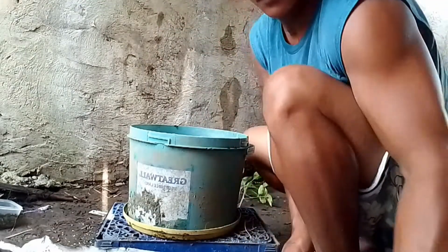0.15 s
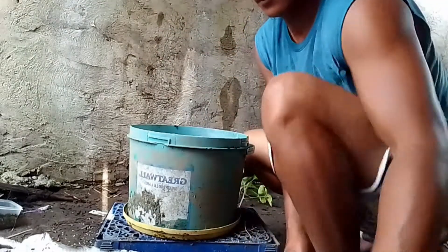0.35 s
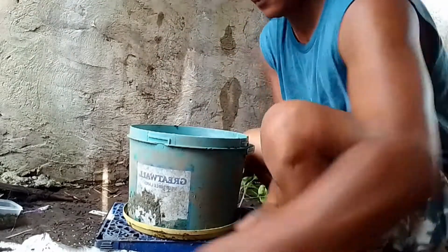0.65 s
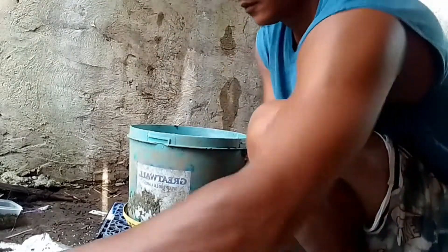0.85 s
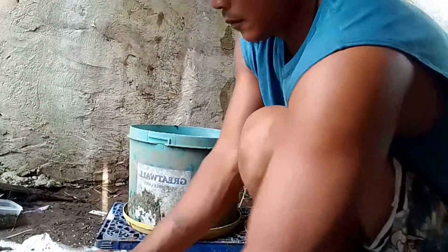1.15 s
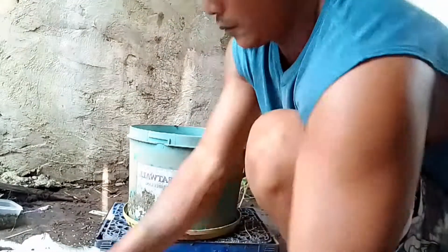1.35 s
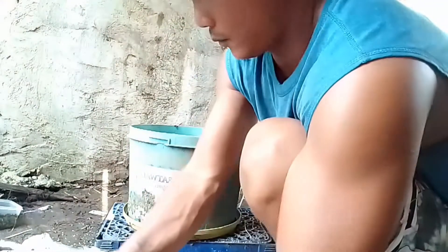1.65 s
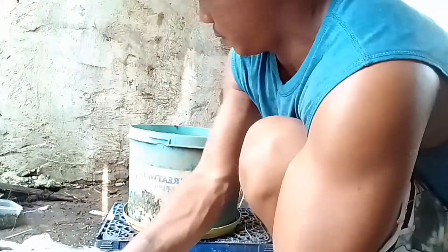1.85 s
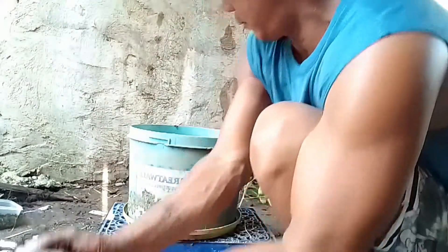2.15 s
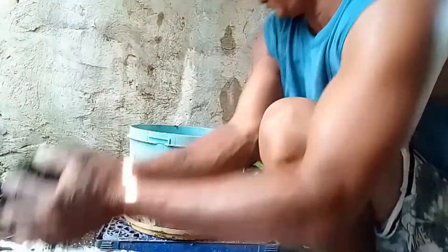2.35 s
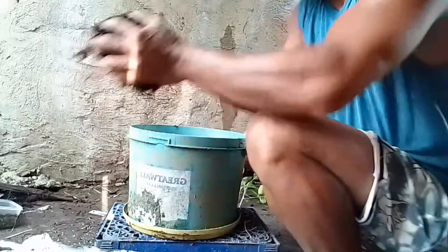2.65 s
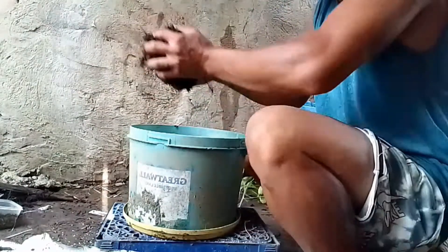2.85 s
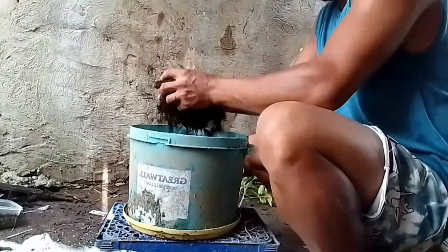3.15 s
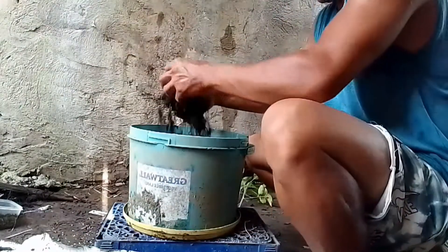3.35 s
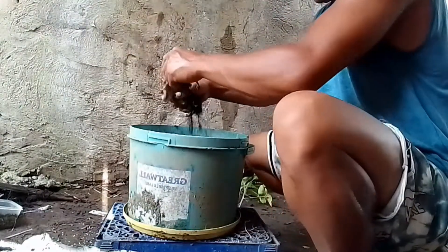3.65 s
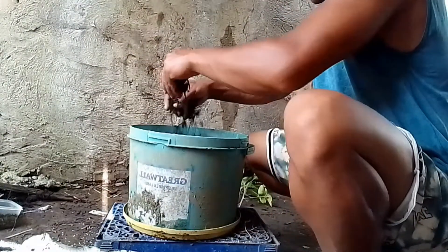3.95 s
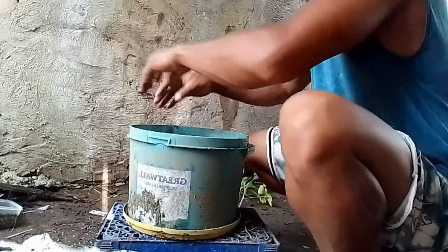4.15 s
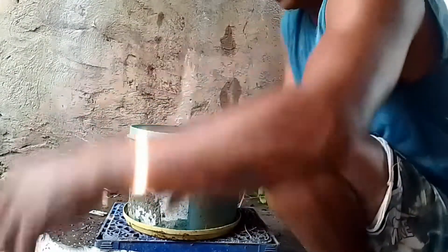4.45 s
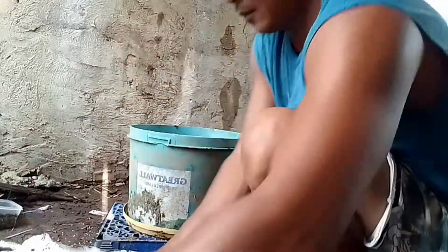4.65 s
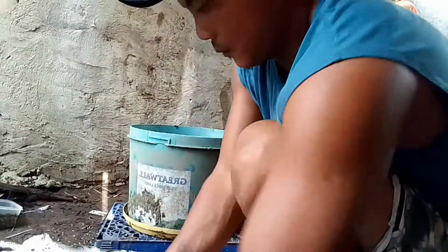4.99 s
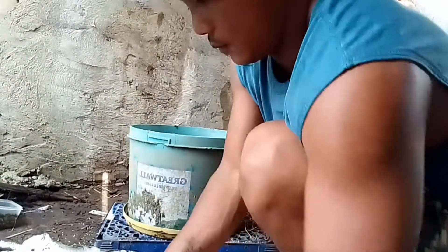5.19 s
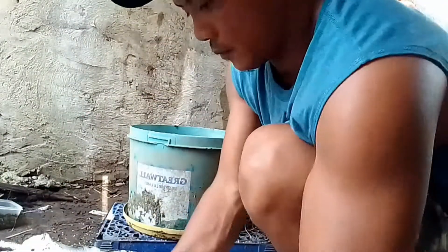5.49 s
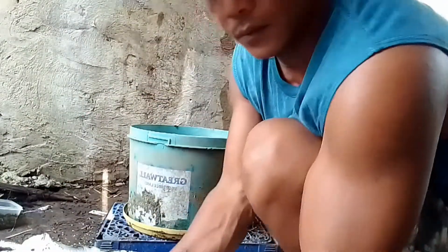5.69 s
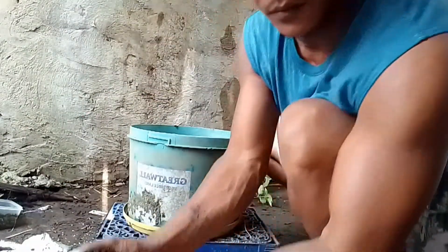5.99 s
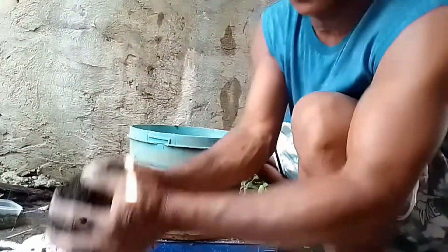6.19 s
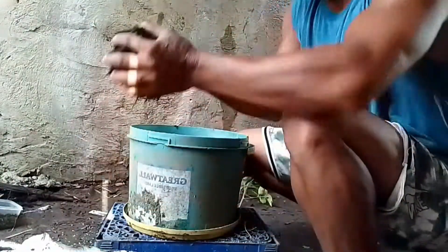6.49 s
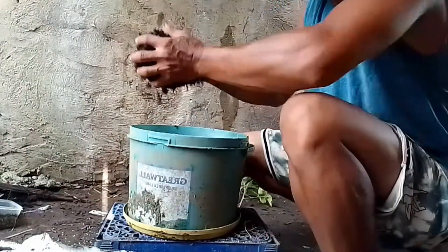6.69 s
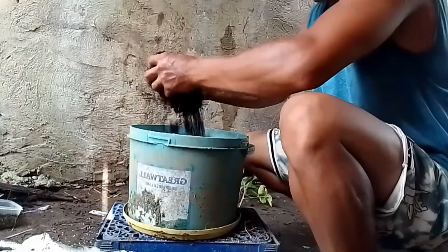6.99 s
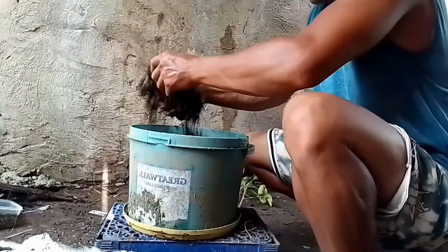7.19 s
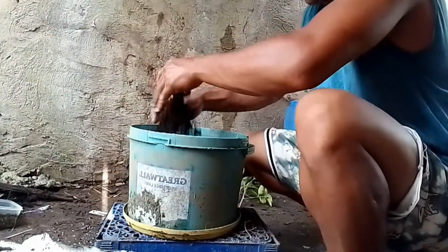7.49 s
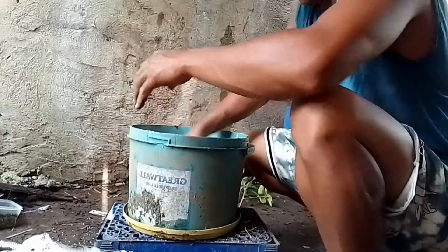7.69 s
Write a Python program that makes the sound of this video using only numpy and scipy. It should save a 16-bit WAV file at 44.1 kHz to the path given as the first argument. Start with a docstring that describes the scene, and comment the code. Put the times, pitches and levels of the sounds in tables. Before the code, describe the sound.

Close gritty soil scraping, a drumming pour into a resonant plastic bucket, plasticky rustles and a faint second pour, with a low engine drone beyond.

```python
"""Close by in a walled yard, hands scrape potting soil together on a plastic sack and crumble it into
a plastic bucket, twice: grains of filtered noise, swelling and sagging with each move. The first handful
drums on the bare bottom as ringing thumps, the second lands softly on soil; grit snaps and the sack ticks
as short bursts. Farther off, beyond the walls, a small engine putters as a sum of harmonics, speeds up
a little and settles. Low noise is the outdoor air."""
import sys
import numpy as np
from scipy import signal
from scipy.fft import rfft, irfft
from scipy.io import wavfile
from scipy.ndimage import uniform_filter1d, minimum_filter1d, map_coordinates

SR = 44100
rng = np.random.default_rng(int(sys.argv[2]) if len(sys.argv) > 2 else 0)


def dump(signal):
    """Clip the signal to [-1, 1] and save it as 16-bit WAV at the path in sys.argv[1]."""
    limited = np.clip(np.atleast_2d(signal).T, -1, 1)
    pcm = np.round(limited * 32767).astype(np.int16)
    wavfile.write(sys.argv[1], SR, pcm)


N = 345303  # samples

# In all tables, level columns are relative: the functions add their own trims.


def from_db(db):
    """Decibels to gain."""
    return 10 ** (np.asarray(db) / 20)


def rms_one(x):
    """Scale to rms 1."""
    return x / np.sqrt(np.mean(x ** 2) + 1e-20)


def in_time(rows):
    """One curve per column after the first, joined by straight lines."""
    s, *columns = np.transpose(rows)
    return [np.interp(np.arange(N) / SR, s, column) for column in columns]


def drift(corner_hz):
    """Slow random wandering with spread near 1: low-passed noise made at a fortieth of the sample rate."""
    step = 40
    pole = np.exp(-2 * np.pi * corner_hz * step / SR)
    noise = rng.standard_normal(N // step + 2002)
    slow = signal.lfilter([1], [1, -2 * pole, pole * pole], noise)[2000:]  # drop the filter's start
    return np.interp(np.arange(N) / step, np.arange(len(slow)), rms_one(slow))


def cut(x, hz, kind, order=2):
    """Butterworth low- or high-pass."""
    sos = signal.butter(order, min(hz, SR / 2 - 1), kind, fs=SR, output="sos")
    return signal.sosfilt(sos, x + 1e-18)


def resonate(x, hz, width_hz):
    """A two-pole resonance with gain 1 on top."""
    r = np.exp(-np.pi * width_hz / SR)
    top = np.array([1, 0, -1]) * (1 - r * r) / 2
    return signal.lfilter(top, [1, -2 * r * np.cos(2 * np.pi * hz / SR), r * r], x + 1e-18)


def colour(x, spectrum, size=8192):
    """Causal (minimum-phase) filter with the given spectrum, found through the cepstrum."""
    hz, db = np.transpose(spectrum)
    grid = np.maximum(np.arange(size // 2 + 1) * SR / size, 1)
    cepstrum = irfft(np.log(from_db(np.interp(np.log(grid), np.log(hz), db))))
    # folding the cepstrum onto positive times makes the filter causal
    cepstrum[1:size // 2] *= 2
    cepstrum[size // 2 + 1:] = 0
    return signal.oaconvolve(x, irfft(np.exp(rfft(cepstrum))))[:len(x)]


def add(track, s, sound):
    """Mix a sound in at time s."""
    start = max(round(s * SR), 0)
    track[start:start + len(sound)] += sound[:N - start]


def gestures(rows, sag_db_per_s, grit_sag_db_per_s, release_db_per_s):
    """Each move swells, sags as the soil runs out (a negative sag rises) and dies away; (body, grit) gains."""
    body, grit = np.zeros(N), np.zeros(N)
    for start, swell_s, hold_s, body_db, grit_db in rows:
        t = np.arange(N) / SR - start
        swell = np.clip(t / max(swell_s, .002), 0, 1) ** 2
        held = np.clip(t - swell_s, 0, hold_s)
        shape = swell * from_db(-release_db_per_s * np.clip(t - swell_s - hold_s, 0, 2))
        # overlapping moves add as powers
        body += (shape * from_db(body_db - sag_db_per_s * held)) ** 2
        grit += (shape * from_db(grit_db - grit_sag_db_per_s * held)) ** 2
    return np.sqrt(body), np.sqrt(grit)


def grains(per_s, spread_db):
    """Clicks at random moments: many small and a few large crumbs (a negative spread: a few small ones)."""
    sizes = from_db(spread_db * np.minimum(rng.exponential(1, N), 5))
    signs = rng.choice([-1, 1], N)
    struck = rng.random(N) < per_s / SR
    return rms_one(sizes * signs * struck)


def crumbs(levels, spectrum, per_s, spread_db, clump_db, catch_db, low_hz, body_db, grit_db, in_bucket=False):
    """A clumpy stream of grains that catches and gives: its lower part is the body, its top the fine grit."""
    body_level, grit_level = levels
    clicks = grains(per_s, spread_db)
    unsteady = from_db(clump_db * drift(20) + catch_db * drift(4.9))
    stream = colour(clicks * unsteady, spectrum)
    if in_bucket:
        stream = bucket(stream)
    stream = cut(stream, low_hz, "high", order=4)
    split_hz = 2500
    body = rms_one(cut(stream, split_hz, "low", order=4))
    grit = rms_one(cut(stream, split_hz, "high", order=4))
    return from_db(body_db) * body_level * body + from_db(grit_db) * grit_level * grit


# hand strokes through the loose heap: start_s, swell_s, hold_s, scrape_db, grit_db
HEAP_STROKES = [(-0.02, 0.017, 0.2, -18, -26.5), (.098, 0.0077, 0.013, -21, -44),
                (.23, 0.018, 0.1, -19.5, -30), (.262, 0.0041, 0.017, -24, -34.5),
                (.345, 0.0039, 0.013, -21, -29.5), (.45, 0.012, 0.21, -23, -33.5),
                (.73, 0.028, 0.037, -25, -28), (.83, 0.0099, 0.25, -31, -43.5),
                (1.0, 0.14, 0.28, -35.5, -54)]
# colour of the scraped soil: frequency_hz, density_db
SOIL_SPECTRUM = [(190, -49), (330, -9), (649, -6.5), (1000, -5), (1360, -2.5), (1550, -6), (2040, -13.5),
                 (4860, -19.5), (5440, -21), (8140, -21.5), (10000, -34), (15500, -34.5)]


def heap_scraping():
    """Hands dragged through loose soil: dense grains under quick strokes."""
    levels = gestures(HEAP_STROKES, sag_db_per_s=16.5, grit_sag_db_per_s=12.5, release_db_per_s=121)
    return crumbs(levels, SOIL_SPECTRUM, per_s=7000, spread_db=1.5, clump_db=1.5, catch_db=0.23,
                  low_hz=261, body_db=-2.0, grit_db=-0.9)


# hand strokes along the sack: start_s, swell_s, hold_s, scrape_db, grit_db
SACK_STROKES = [(5.03, 0.12, 0.086, -46, -42.5), (5.2, 0.047, 0.017, -48, -34),
                (5.3, 0.029, 0.12, -46, -38.5), (5.42, 0.08, 0.25, -43, -39), (5.58, 0.09, 0.042, -34, -24),
                (5.7, 0.044, 0.056, -29, -29.5), (5.82, 0.044, 0.11, -46, -47),
                (5.98, 0.031, 0.066, -53, -44.5), (6.13, 0.037, 0.09, -55, -53)]
# colour of soil on the plastic sack, also for the spills: frequency_hz, density_db
SACK_SPECTRUM = [(240, -49), (400, -10), (543, -12), (750, -14.5), (950, -8), (1200, -1), (1470, -0.5),
                 (2430, -14), (3010, -8.5), (3570, -15.5), (7320, -14.5), (8600, -20), (10100, -28),
                 (15500, -22)]


def sack_scraping():
    """Hands dragged along the sack: sparser, clumpier grains in the plastic's colour."""
    levels = gestures(SACK_STROKES, sag_db_per_s=12, grit_sag_db_per_s=15, release_db_per_s=170)
    return crumbs(levels, SACK_SPECTRUM, per_s=3500, spread_db=-0.2, clump_db=2.5, catch_db=-0.15,
                  low_hz=302, body_db=-3.0, grit_db=-7.0)


# gushes onto the bucket's bare bottom: start_s, swell_s, hold_s, patter_db, grit_db
BARE_POURS = [(3.265, 0.0085, .03, -27.5, -70), (3.308, 0.0062, 0.066, -18, -44),
              (3.35, 0.026, 0.08, -17, -29), (3.45, 0.035, 0.1, -17, -29),
              (3.635, 0.068, 0.063, -21, -31.5), (3.775, 0.054, 0.036, -28, -48),
              (3.9, 0.063, 0.39, -32, -51), (4.43, 0.0038, 0.025, -28, -67)]
# colour of crumbs on the bare bottom, also for the clods: frequency_hz, density_db
PATTER_SPECTRUM = [(130, -50), (220, -8), (268, -7.5), (303, 3), (337, -7), (441, 4), (526, -19),
                   (867, -3.5), (930, -12.5), (1150, -13.5), (1350, -10), (1680, -18), (2110, -29.5),
                   (4790, -42.5), (15500, -67.5)]


def bare_pouring():
    """Soil pattering on bare plastic: grains that set the bucket ringing."""
    levels = gestures(BARE_POURS, sag_db_per_s=14.0, grit_sag_db_per_s=8, release_db_per_s=116)
    return crumbs(levels, PATTER_SPECTRUM, per_s=3400, spread_db=0.46, clump_db=2.5, catch_db=-1.6,
                  low_hz=214, body_db=3.5, grit_db=-4.0, in_bucket=True)


# air and walls of the bucket: resonance_hz, width_hz, level_db
BUCKET_RESONANCES = [(329, 22, -2.5), (352, 17, 0.5), (475, 24, 4), (559, 8.6, 18.5), (627, 7, 11),
                     (890, 8.2, 2.5), (1473, 10, 4), (1337, 27, 7)]


def bucket(x):
    """The bucket's resonances ring along with the grains that land in it."""
    return x + sum(from_db(db) * resonate(x, hz, width) for hz, width, db in BUCKET_RESONANCES)


# clods landing in the bucket: start_s, thump_db, spatter_db
CLODS = [(3.273, -33, -47), (3.307, -20, -22), (3.357, -7, -9), (3.387, -14.5, -19), (3.417, -10, -26),
         (3.444, -8, -28), (3.5, -17, -15), (3.562, -6, -9.5), (3.723, -12, -17.5), (3.744, -12, -23),
         (3.854, -12, -12.5), (3.926, -16.5, -29.5), (4.012, -34, -32), (4.075, -43, -24),
         (4.115, -14.5, -20.5), (4.237, -30, -37), (4.344, -28.5, -56), (4.415, -6.5, -25.5),
         (4.479, -37, -34), (6.89, -59, -36.5), (7.182, -40, -49), (7.24, -49, -48), (7.442, -35, -38),
         (7.51, -49, -48), (7.573, -46, -49), (7.605, -34.5, -60), (7.629, -48, -37), (7.703, -50, -49),
         (7.741, -40, -45)]
# the thump's pitch sinks as the soil loads the bottom: first clod, last clod
EMPTY_THUMP_HZ, LOADED_THUMP_HZ = 445, 388


def clods(thump_width_hz=110, burst_s=0.012, trickle_s=0.027, trickle_db=-15,
          thump_gain_db=4, spatter_gain_db=-1, dull_hz=2600, rebound_db=-11):
    """A clod thumps the bucket's bottom, bursts into a dull spatter and trickles to rest."""
    t = np.arange(SR // 5) / SR
    out = np.zeros(N)
    spatter = cut(colour(grains(4000, 1.4), PATTER_SPECTRUM), 470, "high", order=4)
    spatter = rms_one(cut(spatter, dull_hz, "low"))
    rise = t / burst_s * 2  # the burst peaks at half of burst_s
    burst = rise * np.exp(1 - rise) + from_db(trickle_db) * np.exp(-t / trickle_s)
    pitches = np.geomspace(EMPTY_THUMP_HZ, LOADED_THUMP_HZ, len(CLODS))
    rebound_gaps_s = 0.01 * rng.uniform(0.56, 2.2, (len(CLODS), 2))
    for (s, thump_db, spatter_db), hz, gaps in zip(CLODS, pitches, rebound_gaps_s):
        thump = 1. * (t == 0)
        for _ in range(3):
            thump = resonate(thump, hz, thump_width_hz)  # a soft landing swells over a few cycles
        thump = thump / np.abs(thump).max()
        # the clod's pieces land again, weaker each time
        for k, delay in enumerate(np.cumsum([0, *gaps])):
            add(out, s + delay, from_db(thump_db + thump_gain_db + k * rebound_db) * thump)
        stretch = np.roll(spatter, -round(s * SR))[:len(t)]
        add(out, s, from_db(spatter_db + spatter_gain_db) * burst * stretch)
    return out


# loose soil falling on soil, on the heap or in the bucket: start_s, swell_s, hold_s, patter_db, grit_db
SOFT_POURS = [(1.05, 0.14, 0.42, -36, -56), (2.23, .025, 0.11, -53, -58.5), (3.95, 0.16, 0.48, -46, -51.5),
              (6.85, 0.016, 0.035, -45.5, -50), (6.9, .04, 0.42, -63, -73),
              (7.178, 0.0075, 0.082, -40, -66), (7.41, 0.0081, 0.079, -44.5, -57.5),
              (7.5, 0.0047, 0.29, -35.5, -56.5)]
# colour of soil on soil: frequency_hz, density_db
SOFT_SPECTRUM = [(180, -48.5), (300, 4), (447, 7), (560, -28), (720, -13.5), (1020, -13.5), (1340, 8),
                 (1550, -15), (1800, -19.5), (2610, -29.5), (2900, -24), (4420, -26), (9000, -46),
                 (15500, -62)]


def soft_pouring():
    """Soil landing on soil: sparse, uneven grains without the bucket's ring."""
    levels = gestures(SOFT_POURS, sag_db_per_s=23.5, grit_sag_db_per_s=7.5, release_db_per_s=133)
    return crumbs(levels, SOFT_SPECTRUM, per_s=1500, spread_db=2.0, clump_db=2.5, catch_db=2.5,
                  low_hz=288, body_db=-0.5, grit_db=-3.0)


# stray crumbs sprinkling on the sack: start_s, swell_s, hold_s, patter_db, grit_db
SPILLS = [(3.75, 0.098, 0.74, -68, -70), (4.42, 0.09, 0.21, -63.5, -65)]


def spilling():
    """Stray crumbs on the sack: sparse, clumpy grains with only the treble left."""
    levels = gestures(SPILLS, sag_db_per_s=-4, grit_sag_db_per_s=-7.0, release_db_per_s=88)
    return crumbs(levels, SACK_SPECTRUM, per_s=1400, spread_db=-1.5, clump_db=5.0, catch_db=3.0,
                  low_hz=3700, body_db=5, grit_db=5.5)


# fingers brushing lightly over the sack: start_s, swell_s, hold_s, scrape_db, grit_db
BRUSHES = [(1.71, 0.025, 0.074, -44, -48), (2.74, 0.017, 0.059, -59, -54.5), (6.41, 0.018, 0.21, -44, -53)]
# their thin, dry colour: frequency_hz, density_db
BRUSH_SPECTRUM = [(500, -9), (1350, 2.5), (1700, -18.5), (2250, -6.5), (2800, -5), (3350, -1.5), (3950, -5),
                  (4700, -0.5), (5600, -8), (7000, -6), (10000, -16), (15500, -14)]


def brushing():
    """Light fingers on plastic: grains whose grit fades faster than their body."""
    levels = gestures(BRUSHES, sag_db_per_s=7, grit_sag_db_per_s=28.5, release_db_per_s=87.5)
    return crumbs(levels, BRUSH_SPECTRUM, per_s=3400, spread_db=1.0, clump_db=1.5, catch_db=0.5,
                  low_hz=300, body_db=-8.5, grit_db=-5.0)


# bits of grit and twig snapping: start_s, knock_db, crack_db
SNAPS = [(0.11, -2, -39), (0.278, -2.5, -41), (0.4722, -11, -24), (0.5614, -33, -22.5), (0.8423, -5.5, -47),
         (1.721, -28, -55), (3.308, -23, -47), (3.357, -10, -21), (3.3907, 0, -19.5), (3.5727, 2, -18),
         (3.8313, -7, -29.5), (4.11, -19, -33), (4.4122, -28, -36), (5.156, -26.5, -43), (5.742, -1, -27),
         (5.7903, -9.5, -43), (6.4314, -24, -35.5), (6.881, -27, -50), (6.959, -32, -43.5),
         (7.0863, -47, -38), (7.413, -34, -47)]
# colour of a small sharp crack: frequency_hz, density_db
CRACK_SPECTRUM = [(1200, -5), (2400, 9.5), (3400, 13), (5500, -2), (8300, -11), (10000, -29),
                  (15500, -16.5)]


def snaps(decay_s=0.00086, tail_s=0.025, tail_db=-12, knock_hz=1350, knock_trim_db=-8, crack_trim_db=2):
    """Each snap is a dull knock and a sharp crack, with a short trickle behind them."""
    t = np.arange(SR // 14) / SR
    out = np.zeros(N)
    fade = np.exp(-t / decay_s) + from_db(tail_db) * np.exp(-t / tail_s)
    for (s, knock_db, crack_db), noise in zip(SNAPS, rng.standard_normal((len(SNAPS), 2, len(t)))):
        knock = rms_one(cut(resonate(noise[0], knock_hz, 520), 3000, "low", order=4))
        crack = rms_one(colour(noise[1], CRACK_SPECTRUM, size=512))
        both = from_db(knock_db + knock_trim_db) * knock + from_db(crack_db + crack_trim_db) * crack
        add(out, s, fade * both)
    return out


# creases of the plastic sack ticking: start_s, level_db, pitch_hz
TICKS = [(4.343, -47, 6500), (4.422, -51, 7860), (4.5238, -41, 14000), (4.729, -49, 6500),
         (5.254, -49, 8000), (5.484, -34, 7600), (5.584, -30.5, 7000), (5.59, -38, 14100),
         (5.755, -30, 7460), (5.797, -26.5, 6000), (6.0283, -40.5, 7200), (6.175, -45, 7100),
         (6.268, -55, 12000), (6.561, -49, 7000)]


def ticks(decay_s=0.0017, tail_s=0.017, tail_db=-17, width_hz=3200, sheen_db=-9, low_hz=2200):
    """A crease of the thin plastic flips: a tiny bright burst around a pitch of its own."""
    t = np.arange(SR // 14) / SR
    out = np.zeros(N)
    fade = np.exp(-t / decay_s) + from_db(tail_db) * np.exp(-t / tail_s)
    for (s, db, hz), noise in zip(TICKS, rng.standard_normal((len(TICKS), 2, len(t)))):
        burst = rms_one(resonate(noise[0], hz, width_hz)) + from_db(sheen_db) * noise[1]
        add(out, s, from_db(db) * fade * burst)
    return cut(out, low_hz, "high")


# thin, whistly tones that hover in the quiet rustle during each move: tone_hz, lift_db
SETTLING_RING = [(780, 5), (1270, 5.5), (1660, 3), (2300, 4.5), (2720, 9.5), (3200, 16.5), (3820, 5),
                 (4200, 16.5), (4620, 7), (5830, 18.5), (7520, 10.5)]
CRUMBLING_RING = [(990, 10.5), (1330, 4.4), (1770, 13.5), (2410, 14), (3380, 8), (4170, 14.5), (4560, 8),
                  (5900, 14), (6400, 18), (7180, 11)]
SACK_RING = [(1680, 4.3), (1960, 9.5), (2240, 9), (2830, 12.8), (3060, 8.6), (3760, 14), (4650, 9),
             (5900, 8.2), (7100, 13.4), (8250, 9.3)]
BRUSH_RING = [(3370, 16), (4630, 13), (6300, 16)]
CUPPING_RING = [(2150, 18), (3190, 8.7), (4630, 16), (6230, 9.8), (6940, 17)]
TRICKLE_RING = [(3860, 25), (4790, 13)]
EMPTYING_RING = [(2620, 20), (3380, 15), (3870, 11), (4420, 15.6)]
# when each set of tones is heard: start_s, end_s, between_tones_db, ring
RINGS = [(0.99, 1.7, -3, SETTLING_RING), (1.662, 2.1, -6, BRUSH_RING), (2.65, 3.173, -4, BRUSH_RING),
         (3.882, 5.002, -6, CRUMBLING_RING), (5.05, 5.678, -4.5, SACK_RING), (5.86, 6.42, -2.5, SACK_RING),
         (6.434, 6.794, 0, CUPPING_RING), (6.884, 7.425, -6.5, TRICKLE_RING),
         (7.42, 7.95, -5.5, EMPTYING_RING)]


def hollow_bands(x, plain_above_db=-23, depth_db=8.0, tone_width_hz=125, fade_s=0.16,
                 steadiness=0.61, waver=0.56, waver_hz=0.66, size=1024):
    """Quiet rustle takes on narrow, slowly shifting bands, which for a while hold to fixed sets of whistly
    tones."""
    band_hz, hold_s = 140, .45  # spacing of the random pattern
    hz, s, frames = signal.stft(x, SR, nperseg=size)
    level_db = 10 * np.log10(np.sum(np.abs(frames) ** 2, axis=0) + 1e-12)
    quietness = np.clip((plain_above_db - uniform_filter1d(level_db, size=5)) / 14, .15, 1)
    depth = quietness * np.clip(hz / 2200, 0, 1)[:, None]  # shallower in the bass
    pattern = rng.standard_normal((int(hz[-1] / band_hz) + 2, int(s[-1] / hold_s) + 2))
    places = np.meshgrid(hz / band_hz, s / hold_s, indexing="ij")
    ripple = np.tanh(map_coordinates(pattern, places, order=3))
    gain_db = depth_db * depth * ripple - depth_db * depth ** 2 / 4
    moments = np.minimum((s * SR).astype(int), N - 1)
    for start, end, between_db, ring in RINGS:
        when = np.clip(np.minimum(s - start, end - s) / fade_s, 0, 1)
        where = np.clip(np.minimum(hz - ring[0][0], ring[-1][0] - hz) / 300 + 2, 0, 1)
        tones_db = between_db
        for tone_hz, lift_db in ring:
            peak = np.exp(-((hz - tone_hz) / tone_width_hz) ** 2)
            # each tone comes and goes by itself
            wavering_db = lift_db * (1 + waver * np.tanh(drift(waver_hz)[moments]))
            tones_db = tones_db + np.outer(peak, wavering_db)
        gain_db = gain_db + np.outer(where, when) * (tones_db - steadiness * gain_db)
    return signal.istft(frames * from_db(gain_db), SR, nperseg=size)[1][:N]


def yard(x, wet_db=-14, t60_s=0.24):
    """A ringing tail between bare walls; close reflections ripple its spectrum."""
    t = np.arange(SR) / SR
    tail = rng.standard_normal(SR) * from_db(-60 * t / t60_s) * (t > .02)
    lags_s = rng.uniform(0.00039, .007, size=5)
    tail = tail + sum(np.roll(tail, round(lag * SR)) * (-1) ** k for k, lag in enumerate(lags_s))
    tail = cut(tail, 760, "high")
    return x + from_db(wet_db) * signal.oaconvolve(x, tail / np.sqrt(np.sum(tail ** 2)))[:N]


# engine speed: time_s, firings_per_s
ENGINE_SPEED = [(0.0, 20.68), (0.3, 21.29), (1.1, 21.64), (1.6, 22.39), (2.3, 22.66), (2.7, 23.15),
                (3.5, 23.75), (4.0, 24.45), (5.4, 24.5), (6.2, 24.12), (6.56, 24.75), (6.7, 24.15),
                (6.86, 24.75), (7.02, 24.25), (7.45, 24.7), (7.83, 24.2)]
# level of the exhaust's boom: time_s, level_db
BOOM = [(0, -21.5), (1.26, -20), (1.9, -22.5), (2.55, -27.5), (3.31, -28.5), (3.45, -23.5), (3.64, -29.5),
        (3.92, -26), (4.25, -33), (4.75, -28), (5.15, -23), (5.42, -25.5), (5.67, -24.5), (6.26, -28),
        (7.0, -26.5), (7.24, -31.5), (7.33, -38), (7.7, -27.5), (7.83, -32.5)]
# bark of the exhaust's upper orders: time_s, level_db
BARK = [(0, -1), (1.1, -0.5), (1.5, -7.5), (3.1, -38), (3.8, -2.5), (4.8, -3), (5.3, 4), (6.05, 7),
        (6.4, -6.5), (7.1, -6.5), (7.7, -11)]
# the sixth order, which swells and fades against the others: time_s, level_db
SIXTH_ORDER = [(1.2, -0.5), (1.38, 9.5), (1.85, -10), (2.1, 7), (2.42, 5), (2.95, -4.5), (3.6, 7), (4.4, 4),
               (5.15, 3), (5.35, 0), (5.9, -7), (6.2, 1)]
# the pipe's orders in the open: multiple_of_firing_rate, level_db
OPEN_ORDERS = [(3, -27.5), (4, -22), (5, -9), (6, 1), (7, -2.5), (8, -9.5), (9, -15), (10, -23), (11, -15),
               (14, -16.5), (16, -26.5)]
# the pipe's orders behind the walls: multiple_of_firing_rate, level_db
WALLED_ORDERS = [(3, -22.5), (4, -17), (5, 0), (6, -8.5), (7, -6.5), (8, -10.5), (9, -18.5), (11, -24.5),
                 (13, -41), (16, -46.5)]
# the engine moves behind the walls between these times
LEAVES_S, HIDDEN_S = 1.2, 3.2


def engine(first_firing_s=0.00723, scatter_rad=1.1, open_waver_db=1.0, walled_waver_db=2.5,
           uneven_db=1.5, rough_rad=0.44, wander_rad=0.35):
    """Orders of the firing rate add up to short booms; behind the walls, echoes smear them into a drone."""
    (rate,), (boom_db,) = in_time(ENGINE_SPEED), in_time(BOOM)
    (bark_db,), (sixth_db,) = in_time(BARK), in_time(SIXTH_ORDER)
    way = np.clip((np.arange(N) / SR - LEAVES_S) / (HIDDEN_S - LEAVES_S), 0, 1)
    firings = np.cumsum(rate) / SR - first_firing_s * rate[0]
    smear = np.minimum(way * 4, 1)  # complete after a quarter of the way
    waver_db = (1 - way) * open_waver_db + way * walled_waver_db
    out, power = 0, 0
    for k in range(3, 17):
        open_db = np.interp(k, *np.transpose(OPEN_ORDERS))
        walled_db = np.interp(k, *np.transpose(WALLED_ORDERS))
        order_db = (1 - way) * open_db + way * walled_db
        bark_share = np.clip((k - 6) / 4, 0, 1.75)
        gain = from_db(order_db + bark_share * bark_db + (k == 6) * sixth_db + waver_db * drift(4.9))
        # the longer paths delay each order by a different amount
        lag = smear * (scatter_rad * (k - 6) ** 2 + wander_rad * drift(3.1))
        # no two firings burn alike, which blurs the upper orders most
        lag = lag + rough_rad * bark_share * drift(9.2)
        out = out - gain * np.cos(2 * np.pi * k * firings - lag)
        power = power + gain ** 2 / 2
    return from_db(boom_db + uneven_db * drift(55)) * out / np.sqrt(power)


# colour of the outdoor air: frequency_hz, density_db
AIR_SPECTRUM = [(30, -2), (48, 1), (90, 9.5), (150, 8.5), (230, -20), (320, -26.5), (450, -16), (800, -23),
                (1100, -21), (1380, -18), (1800, -27), (3000, -33.5), (5500, -44), (8200, -39.5),
                (9800, -52.5), (15500, -48)]


def outdoor_air(level_db=-36):
    """Steady noise, mostly low, under everything else."""
    noise = colour(rng.standard_normal(N), AIR_SPECTRUM)
    return from_db(level_db) * rms_one(cut(noise, 23, "high"))


def scene():
    """Two scoops and two pours near the microphone, over the engine and the outdoor air."""
    soil = heap_scraping() + sack_scraping()
    soil += bare_pouring()
    soil += soft_pouring()
    soil += spilling()
    soil += brushing()
    air = outdoor_air()
    rustle = hollow_bands(yard(soil + clods()))
    clicks = yard(snaps() + ticks())
    return (rustle + clicks + engine() + air)[None]


def record(dry, ceiling=0.88, size=221, cutoff_hz=15650):
    """A fast limiter holds the loudest peaks and the top is cut."""
    needed = ceiling / np.maximum(np.abs(dry), ceiling)
    gain = uniform_filter1d(minimum_filter1d(needed, size), size)
    low_pass = signal.ellip(12, .2, 80, cutoff_hz, fs=SR, output="sos")
    return signal.sosfilt(low_pass, dry * gain)


dry = scene()
out = record(dry)
dump(out)
```